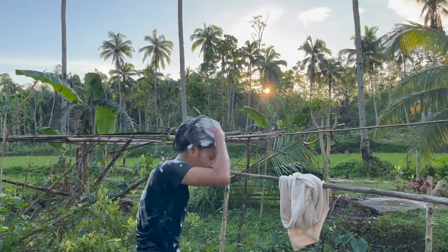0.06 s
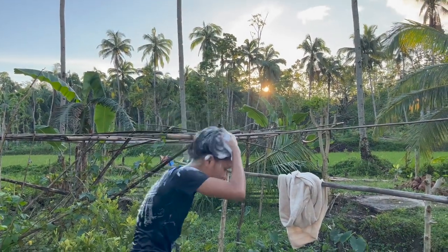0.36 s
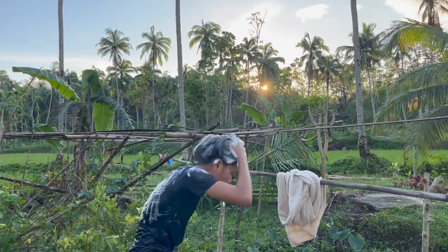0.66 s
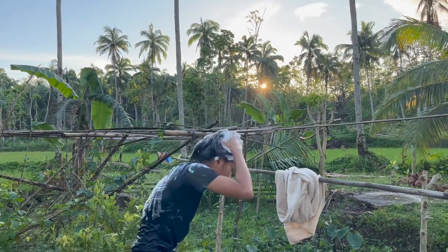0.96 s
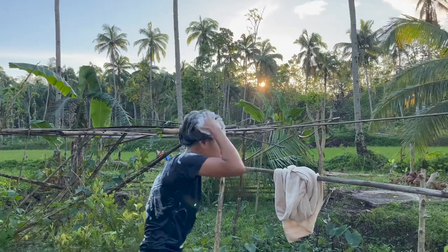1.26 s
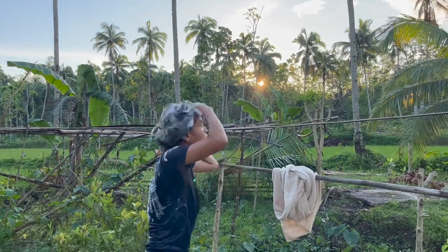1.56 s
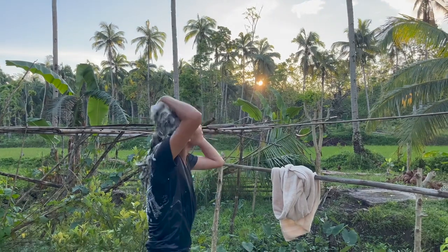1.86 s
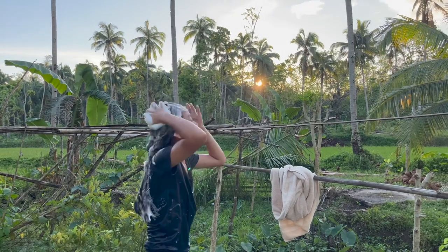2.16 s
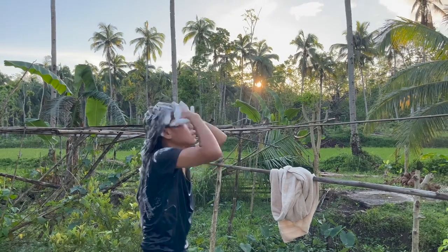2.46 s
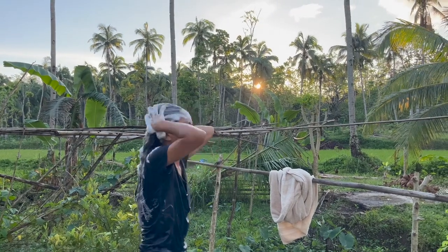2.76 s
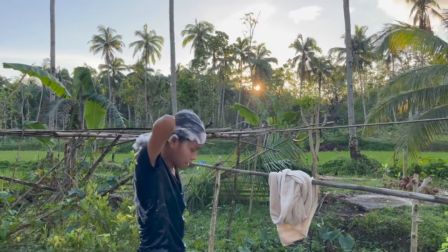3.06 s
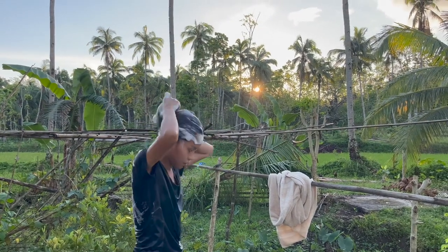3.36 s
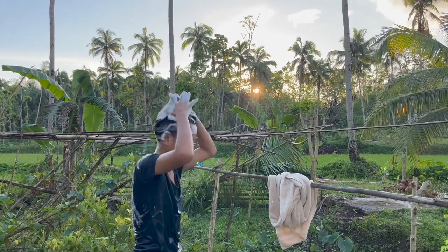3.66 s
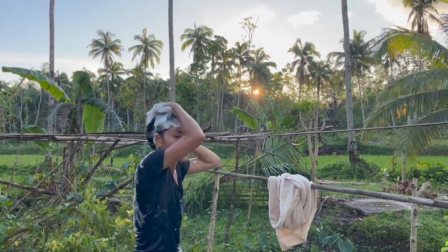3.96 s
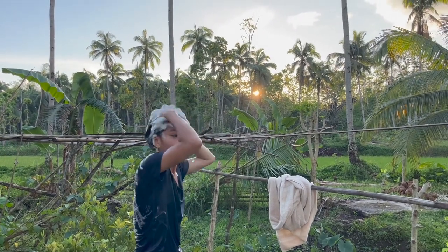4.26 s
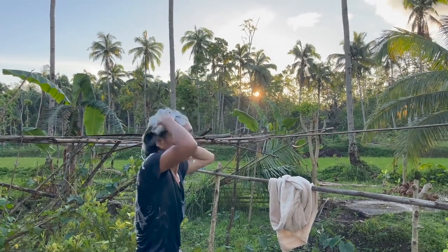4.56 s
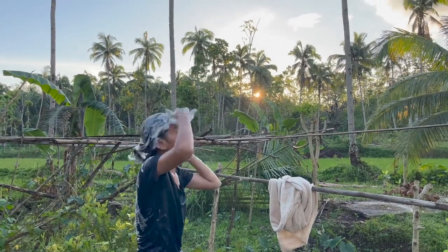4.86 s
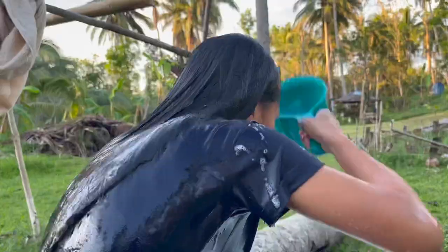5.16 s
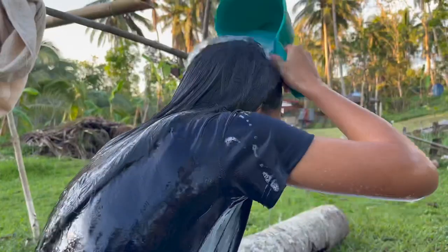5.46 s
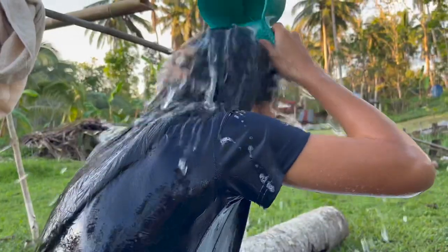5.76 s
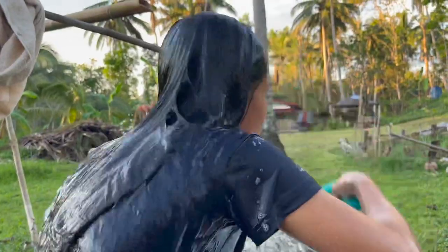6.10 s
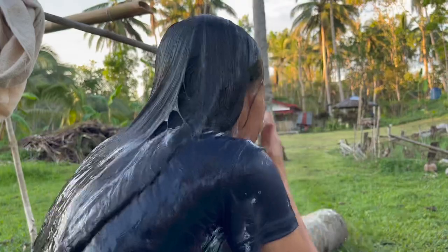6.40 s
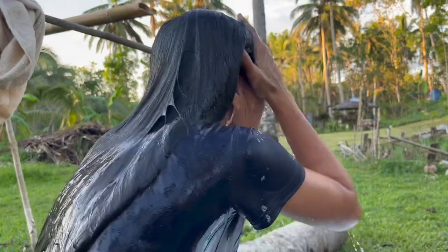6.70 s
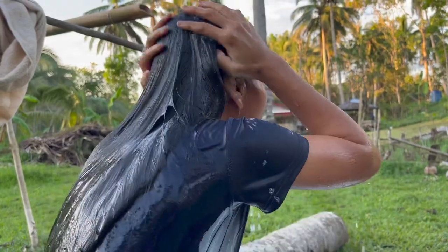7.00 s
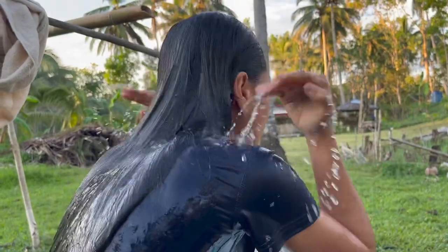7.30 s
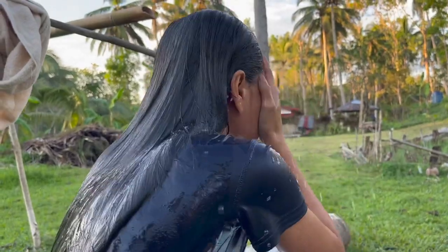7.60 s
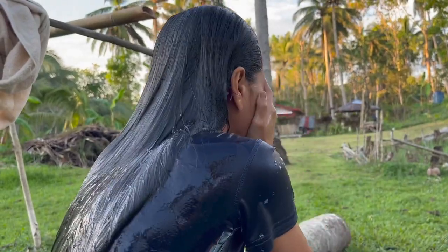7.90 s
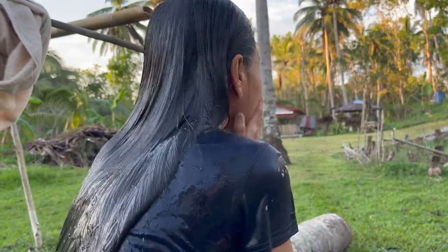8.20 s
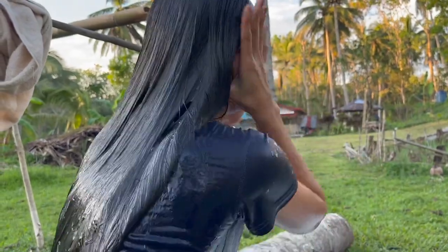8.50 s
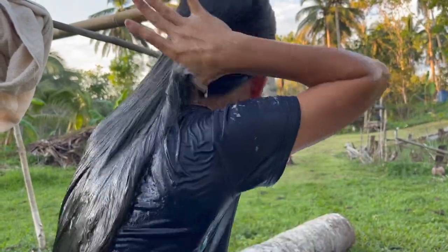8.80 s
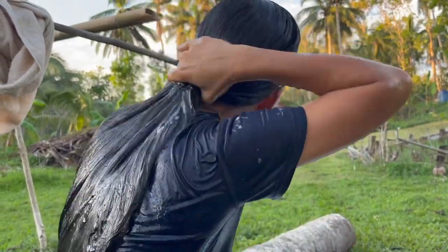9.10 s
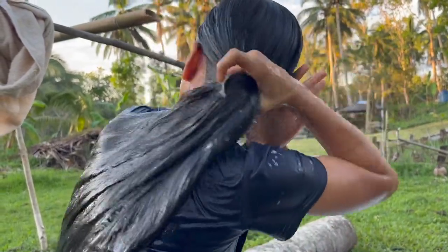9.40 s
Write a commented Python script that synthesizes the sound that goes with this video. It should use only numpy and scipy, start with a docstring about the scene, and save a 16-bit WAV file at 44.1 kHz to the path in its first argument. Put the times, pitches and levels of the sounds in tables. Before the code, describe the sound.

In a quiet garden, insects shrill, a far engine drones and a bird whistles faintly. Close to the microphone, lathered hair crackles and squelches softly under the hands. Then a dipper of water splashes over the head with bubbling plinks, building to a gush and several heavy wet slaps on the ground. The runoff eases into scattered drops while palms squeeze and wipe the hair.

```python
"""A garden at dusk: hair is lathered and rinsed, with insects, far birds and a distant engine.
Foam crackles under the fingers. A dipper of water is tipped over the head: it gurgles through the hair,
spatters on the ground as clicks and ringing bubbles, and lands in heavy slops that trap air.
Then hands wipe the wet face and hair while the last drops fall."""
import sys
import numpy as np
from scipy import signal
from scipy.fft import rfft, irfft, next_fast_len
from scipy.io import wavfile

SR = 44100
rng = np.random.default_rng(int(sys.argv[2]) if len(sys.argv) > 2 else 0)


def master(y):
    """Save y as 16-bit WAV."""
    cut = np.clip(np.atleast_2d(y).T, -1, 1)
    pcm = np.round(cut * 32767)  # scale
    wavfile.write(sys.argv[1], SR, pcm.astype(np.int16))


N = 425565
TIME = np.arange(N) / SR
WATER_START_S, WATER_RISE_S, REFERENCE_FLOW_DB = 5.078, 0.04, -49

# Flow off the head as the dipper empties, then as the hair drains. Each row: time in seconds, flow in dB.
POURING = [(5.12, -52.5), (5.296, -49), (5.462, -55.5), (5.586, -53.5), (5.922, -46), (6.08, -46)]
DRAINING = [(6.54, -48.5), (6.7, -46), (6.99, -50.5), (7.47, -50.5), (8.26, -56.5), (8.44, -59.5),
            (9.29, -57.5), (9.64, -59.5)]
# The bulk of the water hits the ground. Each row: start in seconds, length in seconds, flow in dB.
GUSH = [(6.1, 0.53, -36)]

def water_flow_db():
    """The pour and the draining after it, with the gush on top."""
    steady_db, = in_time(list(POURING) + list(DRAINING))
    gush = swells(GUSH, attack_s=0.029, release_s=0.39)
    return 20 * np.log10(np.hypot(from_db(steady_db), gush))


# Spectra of running water. Each row: frequency in Hz, gain in dB.
SPATTER_COLOUR = [(700, -19), (1150, -2), (1700, 5.5), (2200, -1.5), (2900, 6), (4900, 5), (7500, 2),
                  (16000, -4.5)]
SPRAY_COLOUR = [(3000, -6), (5500, -11), (7600, 7), (10000, 2.5), (12000, 2), (15000, -4)]
GURGLE_COLOUR = [(60, -9), (140, -1.5), (220, -5), (340, 5.5), (550, -1), (850, -3), (1500, -8),
                 (3000, -39)]
# Dipper or hand pushes water through hair. Each row: start in seconds, length in seconds, level in dB.
SQUEEZES = [(5.1, 0.46, -59), (5.62, 0.37, -64), (6.62, 0.38, -63), (8.04, 0.14, -58), (8.2, 0.2, -58.5)]

def runoff():
    """Water falls in clumps of ringing spatter, fine spray and low gurgle; squeezed hair squishes."""
    flow_db = water_flow_db()
    excess_db = flow_db - REFERENCE_FLOW_DB
    per_s = 1050 * from_db(0.62 * excess_db)  # stronger flow: louder drops, and somewhat more of them
    clumps = np.clip((TIME - WATER_START_S) / WATER_RISE_S, 0, 1) * from_db(drift(45))
    rings = bubbles(impacts(per_s, size_db=3.5), low_hz=867, high_hz=6230, cycles=30.6, rise=0.24)
    rings = rms_one(scatter(rings, t60_s=0.073, wet_db=2))
    ring_gain = from_db(np.minimum(0.25 * excess_db, 0))  # a thin trickle traps fewer bubbles
    ticks = crackle(impacts(per_s * 0.7, size_db=4), t60_s=0.01)
    spatter = rms_one(colour((ring_gain * rings + ticks) / np.hypot(ring_gain, 1), SPATTER_COLOUR))
    spray = crackle(impacts(per_s * 1.6, size_db=4), t60_s=0.027)
    spray = rms_one(colour(spray, SPRAY_COLOUR))
    gurgle = bubbles(impacts(per_s * 0.45, size_db=2), low_hz=115, high_hz=1400, cycles=15, rise=0.35)
    gurgle = rms_one(colour(scatter(gurgle, t60_s=0.036, wet_db=-7), GURGLE_COLOUR))
    squish = bubbles(impacts(per_s * 0.22, size_db=1), low_hz=953, high_hz=2090, cycles=40, rise=0.45)
    running = from_db(np.minimum(-59 + 1.57 * excess_db, -52))  # hair can carry only so much water
    squeezed = swells(SQUEEZES, attack_s=0.035, release_s=0.057)
    falling = from_db(flow_db - 2) * spatter + from_db(-51.5 + 0.97 * excess_db) * spray
    in_hair = np.hypot(running, squeezed) * gurgle + from_db(-2.5) * squeezed * squish
    return clumps * (falling + in_hair)


# Heavy slops of water and wet palms. Each row: start in seconds, relative level in dB,
# resting pitch of the trapped air in Hz, relative splash level in dB.
SLOPS = [(0.765, -41, 312, -13.5), (4.709, -45.5, 374, -13.5), (5.196, -39.5, 436, -3),
         (5.314, -44.5, 404, -14), (5.637, -43, 564, 2.5), (6.23, -32, 383, -4), (6.31, -28.5, 705, 0),
         (6.38, -25.5, 409, -17), (6.406, -34, 155, -29), (6.649, -21, 409, -8), (6.7393, -19, 345, -14.5),
         (6.812, -29.5, 434, -10), (6.828, -31, 462, -24), (7.854, -44.5, 310, -11), (8.215, -36, 293, -14),
         (8.288, -38, 393, -15), (8.637, -46, 248, -3), (9.152, -45.5, 443, -12), (9.304, -44, 341, -12)]
# Spectrum of the thud. Each row: frequency in Hz, gain in dB.
THUD_COLOUR = [(40, -27), (90, 6.5), (200, 2), (380, 11), (830, 6.5), (1200, -5.5), (2500, -31.5)]

def slops():
    """A mass of water lands with a splash and a thud; the air trapped under it rings and wobbles."""
    out, t = np.zeros((2, N)), TIME[:SR // 5]
    splash_colour = [(400, -16), (800, 4.5), (1800, 9.5), (3000, 5), (6000, -8)]
    for start_s, level_db, rest_hz, splash_db in SLOPS:
        thud = colour(burst(t60_s=0.072, rise_s=0.0035), THUD_COLOUR)
        splash = colour(burst(t60_s=0.044, rise_s=0.00017), splash_colour)
        pitch_hz = rest_hz * (1 + 0.447 * np.exp(-t / 0.008))  # sinks as the pocket opens
        pitch_hz *= np.exp(0.09 * drift(200)[:len(t)])
        pocket = np.sin(phase_of(pitch_hz)) * strike(t, t60_s=0.076, rise_s=0.0062)
        body = rms_one(rms_one(thud) * [[1], [0.5]] + from_db(1.5) * rms_one(pocket) * MID_ONLY)
        slop = body + from_db(splash_db + 5.5) * rms_one(splash)
        add(out, slop * from_db(level_db - 22), start_s)
    return scatter(out, t60_s=0.2, wet_db=-10)


def stray_drops():
    """Small drops break off at random, more and bigger in a stronger flow; rows as in BIG_DROPS."""
    excess_db = water_flow_db() - REFERENCE_FLOW_DB
    per_s = 25 * from_db(0.3 * excess_db) * (TIME > WATER_START_S)
    born = np.flatnonzero(rng.random(N) < per_s / SR)
    size_db, detune = rng.standard_normal((2, N))[:, born]
    level_db = -50.5 + 0.35 * excess_db[born] + size_db
    ring_hz = 3490 * 2 ** (0.44 * detune)
    return list(zip(TIME[born], level_db, ring_hz))


# The biggest drops and wet clicks. Each row: start in seconds, relative level in dB, ring pitch in Hz.
BIG_DROPS = [(0.928, -54.5, 1810), (1.082, -52.5, 3700), (2.4922, -58.5, 2140), (5.1584, -36, 9300),
             (5.349, -41.5, 2280), (5.785, -39, 3200), (5.8885, -39, 3000), (5.917, -34, 6700),
             (5.966, -33.5, 4120), (6.017, -32.5, 4250), (6.0628, -32, 4440), (6.1923, -32, 1900),
             (6.2225, -27, 3000), (6.3, -23.5, 1850), (6.308, -26.5, 4570), (6.3414, -31, 3120),
             (6.3634, -31.5, 4470), (6.4178, -31.5, 9260), (6.5225, -35.5, 4000), (6.5961, -27.5, 3930),
             (6.62, -31, 5500), (6.648, -25.5, 1980), (7.102, -37.5, 9850), (7.1409, -39.5, 4550),
             (7.4544, -45.5, 1530), (7.616, -41.5, 3240), (7.629, -44, 1540), (7.7307, -39, 8900),
             (7.9983, -47, 1680), (8.0376, -42, 7160), (8.096, -39, 3900), (8.3215, -46.5, 2740),
             (8.6342, -48.5, 3720), (8.9605, -49, 2920), (9.2474, -46.5, 4200)]

def drops(ring_cycles, tone_cycles):
    """Each drop bursts with a click, a rough ring and a brief tone."""
    out, t = np.zeros((2, N)), TIME[:SR // 5]
    onset = SR // 200  # the first 5 ms set the level
    click_colour = [(500, -16), (2000, 4.5), (9000, 1), (16000, 3)]
    for start_s, level_db, hz in list(BIG_DROPS) + stray_drops():
        puff = burst(t60_s=ring_cycles / hz, rise_s=0.0008)
        ring = resonate(resonate(puff, hz, hz * 0.55), hz, hz * 1.1)
        click = colour(burst(t60_s=0.016, rise_s=0.0005), click_colour)
        tone = np.sin(2 * np.pi * hz * t) * t * np.exp(-t * hz / tone_cycles) * MID_ONLY
        parts = [(ring, 0), (click, -3.5), (tone, -5)]
        drop = sum(from_db(db) * part / np.std(part[:, :onset]) for part, db in parts)
        add(out, drop / np.std(drop[:, :onset]) * from_db(level_db - 1.5), start_s)
    return scatter(out, t60_s=0.1, wet_db=-5)


# Bubbles in the dipper and the runoff. Each row: start in seconds, level in dB, starting pitch in Hz.
PLINKS = [(1.291, -52, 785), (5.364, -39, 1400), (5.382, -34.5, 1580), (5.478, -38, 1054),
          (5.503, -31, 1520), (5.62, -39.5, 1330), (5.704, -41, 870), (5.784, -37, 746),
          (5.841, -37.5, 970)]

def plinks(rise_per_s):
    """A bubble rings briefly; its pitch climbs as it nears the surface."""
    out, t = np.zeros((2, N)), TIME[:SR // 10]
    for start_s, level_db, hz in PLINKS:
        tone = np.sin(phase_of(hz * (1 + rise_per_s * t)))
        add(out[0], from_db(level_db) * tone * strike(t, t60_s=0.031, rise_s=0.00091), start_s)
    return scatter(out, t60_s=0.045, wet_db=-3)


# A palm presses foam or slides over wet hair. Each row: start in seconds, length in seconds,
# level in dB, pitch of the hollow under it in Hz, squish against the hollow in dB.
WIPES = [(0.76, 0.049, -50, 900, -3), (1.125, 0.037, -56, 520, 0.5), (1.7, 0.16, -68, 1000, -14),
         (2.185, 0.062, -66, 780, -6), (3.22, 0.096, -66, 850, -2), (3.724, 0.071, -59, 820, -0.5),
         (4.543, 0.038, -61.5, 900, 6), (6.922, 0.034, -39.5, 716, -4.5), (6.946, 0.1, -46, 554, -4),
         (7.028, 0.11, -50, 575, -21.5), (8.056, 0.081, -50, 483, 1), (8.716, 0.096, -63.5, 820, 5.5),
         (8.79, 0.047, -54.5, 517, 1.5)]
# Spectrum of the squish. Each row: frequency in Hz, gain in dB.
SQUISH_COLOUR = [(500, -16.5), (1200, 3), (1800, 6.5), (2400, -2.5), (3600, -2), (6000, -6), (12000, -24)]

def wipes(hollow_width, hollow_rise):
    """Wet hairs slip under a palm: a soft squish, and a hollow note that rises as the hand closes."""
    out, t = np.zeros((2, N)), TIME[:SR // 4]
    for start_s, length_s, level_db, hz, squish_db in WIPES:
        slips = rng.standard_normal((2, len(t))) * from_db(2.96 * drift(267)[:len(t)])
        pitch_hz = hz * (1 + hollow_rise * (np.minimum(t / length_s, 1) - 0.5))
        carrier = np.exp(1j * phase_of(pitch_hz))
        lowpass = signal.butter(2, hz * hollow_width / 2, fs=SR, output="sos")
        hollow = rms_one(np.real(carrier * signal.sosfilt(lowpass, slips / carrier)))  # gliding band
        squish = from_db(squish_db) * rms_one(colour(slips, SQUISH_COLOUR))
        press = gate(t, length_s, attack_s=0.015, release_s=0.042)
        add(out, from_db(level_db) * press * (hollow + squish), start_s)
    return out


# Firm strokes through the lather. Each row: start in seconds, length in seconds, level in dB.
STROKES = [(0, 0.19, -66), (.76, 0.44, -69.5), (2.04, 0.28, -69), (3.55, 0.37, -73), (4.15, 0.77, -71)]
# The hands lift and the light rubbing stops. Each row: start in seconds, length in seconds.
PAUSES = [(0.26, 0.37), (1.444, 0.19), (2.25, 0.2), (3.38, 0.12), (4.73, 0.14)]
# Spectrum of the foam. Each row: frequency in Hz, gain in dB.
LATHER_COLOUR = [(250, 7), (1000, 8.5), (1800, 4.5), (4500, -4), (16000, -40)]

def lather():
    """Foam crackles unevenly under the fingers until the water comes."""
    foam = crackle(impacts(per_s=600, size_db=2.5), t60_s=0.066) * from_db(1.6 * drift(24.63))
    before_rinse = np.clip((WATER_START_S - TIME) / 0.013, 0, 1)
    lifted = sum(gate(TIME - start_s, length_s, 0.052, 0.052) for start_s, length_s in PAUSES)
    light = (1 - lifted) * from_db(-73.5 + 2 * drift(4.04))
    firm = swells(STROKES, attack_s=0.011, release_s=0.12)
    return before_rinse * np.hypot(light, firm) * rms_one(colour(foam, LATHER_COLOUR))


# Insect choruses. Each row: centre in Hz, nominal width in Hz, level in dB, throb depth in dB.
INSECTS = [(4350, 400, -85, 5), (5410, 380, -77, 3), (7452, 425, -59.5, 0.5), (10440, 630, -65.5, .2)]

def insects(throb_hz):
    """Many far insects merge into narrow bands of shrilling; the lower bands throb most."""
    out = 0
    throb = np.sin(phase_of(throb_hz + 0.8 * drift(2.95)))
    for hz, width_hz, level_db, throb_db in INSECTS:
        hiss = rng.standard_normal((2, N))
        chorus = resonate(resonate(hiss, hz, width_hz * 1.65), hz, width_hz * 1.65)
        out += rms_one(chorus) * from_db(level_db + throb_db * throb + 0.5 * drift(59))
    return out


# Loudness of the engine. Each row: time in seconds, relative level in dB.
ENGINE_LEVELS = [(0, -61.5), (3.6, -60), (4.2, -61.5), (8.2, -60.5), (8.6, -70.5)]

def engine(firing_hz):
    """A distant engine: its firing tone and octave, wavering on the way, over a dull drone."""
    phase = phase_of(firing_hz + 0.5 * drift(3.4))
    hum = np.sin(phase) * from_db(0.73 * drift(16)) + from_db(-11.5) * np.sin(2 * phase)
    drone = noise([(30, -31.5), (60, 13.5), (90, -4), (200, -42)])
    level_db, = in_time(ENGINE_LEVELS)
    return from_db(level_db) * (from_db(-1) * rms_one(hum) * MID_ONLY + from_db(-4) * drone)


# Calls of a far bird. Each row: start in seconds, relative level in dB, time stretch as a ratio.
BIRD_CALLS = [(0.575, -76, 0.95), (1.764, -78, 0.98), (2.93, -78.5, 0.98)]
# Contour of one call. Each row: unstretched time in seconds, pitch in Hz, gain in dB.
CALL_SHAPE = [(0, 5100, 9), (.026, 3650, 17.5), (0.048, 2690, 4), (.11, 2960, 2), (0.15, 3330, 12),
              (.205, 4370, 16)]
# Other birds answer. Each row: start in seconds, length in seconds, relative level in dB,
# first pitch in Hz, last pitch in Hz.
CHIRPS = [(3.392, .055, -73, 4330, 3730), (3.475, 0.055, -75, 5350, 4000)]

def birds():
    """A thin whistle dips and softens in the middle, varying each time; fainter chirps arch downward."""
    out, t = np.zeros((2, N)), TIME[:SR // 4]
    shape_s, shape_hz, shape_db = np.transpose(CALL_SHAPE)
    for start_s, level_db, stretch in BIRD_CALLS:
        pitch_hz = np.interp(t / stretch, shape_s, shape_hz) * (1 + 0.0135 * drift(50.4)[:len(t)])
        call_db = level_db - 1 + np.interp(t / stretch, shape_s, shape_db) + 3.4 * drift(55.6)[:len(t)]
        envelope = gate(t, shape_s[-1] * stretch, attack_s=0.0062, release_s=0.0062)
        add(out, from_db(call_db) * envelope * np.sin(phase_of(pitch_hz)), start_s)
    for start_s, length_s, level_db, from_hz, to_hz in CHIRPS:
        progress = np.minimum(t / length_s, 1)
        pitch_hz = from_hz + (to_hz - from_hz) * progress ** 1.2
        envelope = np.sqrt(4 * progress * (1 - progress))
        add(out[0], from_db(level_db) * envelope * np.sin(phase_of(pitch_hz)), start_s)
    return from_db(-4.5) * scatter(out, t60_s=0.12, wet_db=-1)


# Swells of the rumble. Each row: start in seconds, length in seconds, level in dB.
RUMBLE_SWELLS = [(0, 1.31, -62), (1.8, 0.5, -65.5), (2.55, 1.4, -71.5)]
# Spectra of the background. Each row: frequency in Hz, gain in dB.
RUMBLE_COLOUR = [(60, -18), (165, 5), (220, -1.5), (300, -10.5), (600, -42.5)]
AIR_COLOUR = [(25, -30.5), (60, 8), (170, -12), (350, -18), (600, -17), (1080, -13), (1300, -26),
              (3000, -23), (4500, -21), (9000, -31), (16000, -62)]

def surroundings():
    """Steady outdoor air, and a low rumble that swells a few times and sinks back."""
    rumble_gain = np.hypot(from_db(-74.5), swells(RUMBLE_SWELLS, attack_s=0.058, release_s=0.23))
    return from_db(-68) * noise(AIR_COLOUR) + rumble_gain * noise(RUMBLE_COLOUR)


def impacts(per_s, size_db):
    """Random clicks, mostly small and a few large, of even mean power whatever their rate."""
    born = rng.random(N) < per_s / SR
    sizes = from_db(size_db * np.minimum(rng.exponential(1, N), 4))
    return born * sizes * rng.standard_normal((2, N)) / np.sqrt(per_s)


def bubbles(clicks, low_hz, high_hz, cycles, rise):
    """Each click rings a bubble of random size; its pitch climbs by a share as it nears the surface."""
    out, born = np.zeros((2, N)), np.flatnonzero(clicks[0])
    age = np.linspace(0, 1, 2048)
    tone = np.sin(2 * np.pi * cycles * (age + rise * age ** 2 / 2)) * from_db(-60 * age)
    pitches_hz = low_hz * (high_hz / low_hz) ** rng.random(N)[born]
    for i, hz in zip(born, pitches_hz):
        ring = np.interp(TIME[:int(SR * cycles / hz)] * hz / cycles, age, tone)
        add(out, hz * clicks[:, i, None] * ring, TIME[i])
    return rms_one(out)


def crackle(clicks, t60_s):
    """Each click frays into a tiny puff of noise."""
    decay = from_db(-120 / (t60_s * SR))
    power = signal.lfilter([1], [1, -decay], np.mean(clicks ** 2, axis=0) + 1e-18)
    return rms_one(np.sqrt(power) * rng.standard_normal((2, N)))


def scatter(x, t60_s, wet_db):
    """A short diffuse tail: splinters of drops, echoes from ground and body."""
    tail = burst(t60_s, rise_s=0.00076)
    tail /= np.sqrt(np.sum(tail ** 2, axis=1, keepdims=True))
    return x + from_db(wet_db) * signal.oaconvolve(x, tail, axes=1)[:, :N]


def burst(t60_s, rise_s):
    """A pair of noise puffs."""
    t = TIME[:SR // 5]
    return rng.standard_normal((2, len(t))) * strike(t, t60_s, rise_s)


def noise(points):
    """A pair of coloured noises, rms 1."""
    return rms_one(colour(rng.standard_normal((2, N)), points))


def resonate(x, hz, width_hz):
    """One resonance with peak gain 1."""
    radius = np.exp(-np.pi * width_hz / SR)
    feedback = [1, -2 * radius * np.cos(2 * np.pi * hz / SR), radius ** 2]
    return signal.lfilter(np.array([1, 0, -1]) * (1 - radius ** 2) / 2, feedback, x + 1e-18)


def colour(x, points):
    """Minimum-phase filter through (Hz, dB) points."""
    size = 4096
    cepstrum = irfft(np.log(from_db(at_hz(points, np.arange(size // 2 + 1) * SR / size))))
    cepstrum[1:size // 2] *= 2
    cepstrum[size // 2 + 1:] = 0
    response = irfft(np.exp(rfft(cepstrum)))[None, :size // 2]
    return signal.oaconvolve(x, response, axes=1)[:, :x.shape[1]]


def strike(t, t60_s, rise_s):
    """Envelope: quick rise, exponential decay."""
    return (1 - np.exp(-t / rise_s)) * from_db(-60 * t / t60_s)


def gate(t, length_s, attack_s, release_s):
    """Envelope: linear rise, hold, linear release."""
    return np.clip(np.minimum(t / attack_s, (length_s - t) / release_s), 0, 1)


def swells(rows, attack_s, release_s):
    """Summed gain of gestures, one gate per row."""
    return sum(from_db(db) * gate(TIME - start_s, length_s, attack_s, release_s)
               for start_s, length_s, db in rows)


def drift(per_s):
    """Random wander with standard deviation 1."""
    knots = rng.standard_normal(4096)
    return np.interp(TIME * per_s, np.arange(len(knots)), knots) / np.sqrt(2 / 3)


def phase_of(hz):
    """Running phase in radians."""
    return 2 * np.pi * np.cumsum(hz) / SR


def from_db(db):
    """Decibels to gain."""
    return 10 ** (np.asarray(db) / 20)


def rms_one(x):
    """Scale to unit rms."""
    return x / np.sqrt(np.mean(x ** 2) + 1e-30)


def in_time(rows):
    """One curve per value column of a table."""
    times_s, *columns = np.transpose(rows)
    return [np.interp(TIME, times_s, column) for column in columns]


def at_hz(points, hz):
    """Read a table along log frequency."""
    points_hz, values = np.transpose(points)
    return np.interp(np.log(np.maximum(hz, 1)), np.log(points_hz), values)


def add(out, sound, start_s):
    """Mix a sound in."""
    start = max(int(start_s * SR), 0)
    out[..., start:start + sound.shape[-1]] += sound[..., :N - start]


# Stereo image of close and far sounds. Each row: frequency in Hz, left-right likeness from 0 to 1.
NEAR_LIKENESS = [(500, 0.84), (1400, 0.56), (2200, 1), (3800, 0.44), (5600, 0.58), (7700, 0.76),
                 (8800, 0.81), (11000, 0.79), (12500, 1)]
FAR_LIKENESS = [(60, 0.99), (1400, 0.29), (2200, 1), (3800, 0.13), (7500, 0.65), (9000, 1)]
# Level between the sides. Each row: frequency in Hz, left minus right in dB.
BALANCE = [(200, -3), (450, -3.5), (900, 1), (16000, -1)]
# Phase between the sides. Each row: frequency in Hz, lead of the left in radians.
PHASE_LEAD = [(2600, 0), (3600, 0.76), (5300, 0.5), (5800, -3), (6800, -3.5), (8300, -6.5), (10000, -6),
              (12000, -10), (13700, -10), (14600, -12)]
MID_ONLY = [[1], [0]]

def spread(pair, likeness):
    """Mid and side become left and right, with the likeness, phase and balance of each frequency."""
    size = next_fast_len(N)
    hz = np.arange(size // 2 + 1) * SR / size
    mid, side = rfft(pair, size)
    alike = np.clip(at_hz(likeness, hz), -0.99, 0.99)
    signs = np.array([[1], [-1]])
    stereo = np.sqrt(1 + alike) * mid + np.sqrt(1 - alike) * side * signs
    stereo *= np.exp(0.5j * signs * at_hz(PHASE_LEAD, hz))
    stereo *= from_db(signs * at_hz(BALANCE, hz) / 2)
    return irfft(stereo, size)[:, :N]


def scene():
    """Water close by, the garden all round."""
    garden = surroundings() + engine(firing_hz=61.3) + insects(throb_hz=6.3) + birds()
    water = runoff() + lather() + wipes(hollow_width=0.93, hollow_rise=0.13) + plinks(rise_per_s=20)
    water += slops() + drops(ring_cycles=42, tone_cycles=2.3)
    return spread(water, NEAR_LIKENESS) + spread(garden, FAR_LIKENESS)


def record(dry):
    """Steep low-pass at 16 kHz."""
    return signal.sosfilt(signal.ellip(10, 0.1, 80, 16000, fs=SR, output="sos"), dry)


dry = scene()
out = record(dry)
master(out)
```